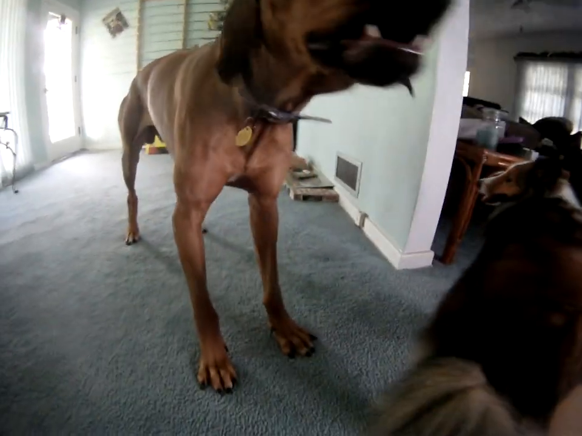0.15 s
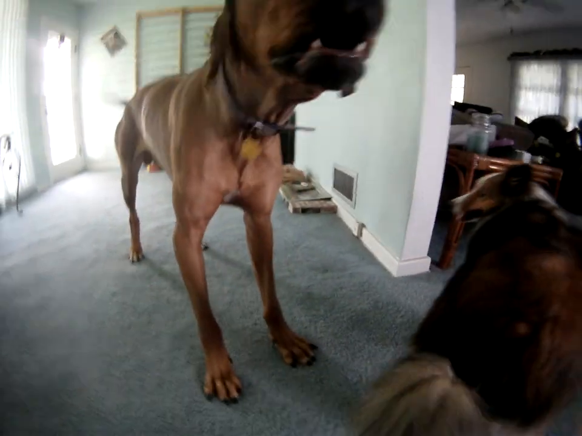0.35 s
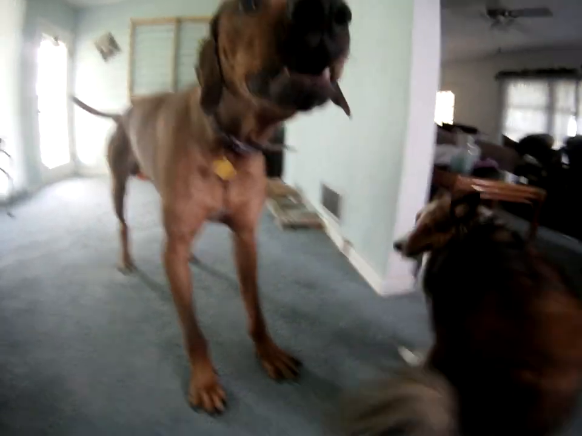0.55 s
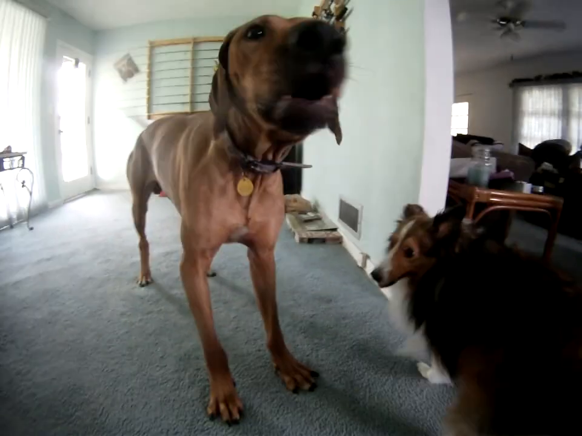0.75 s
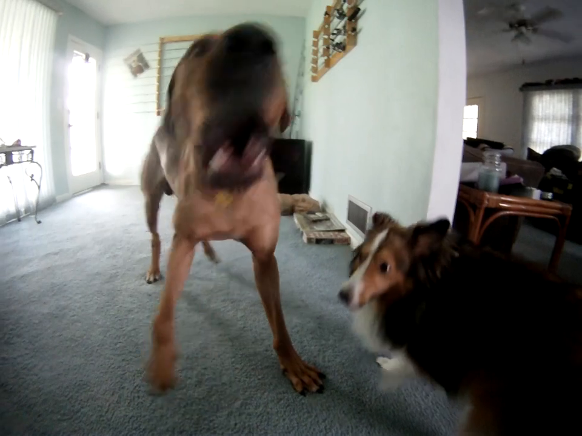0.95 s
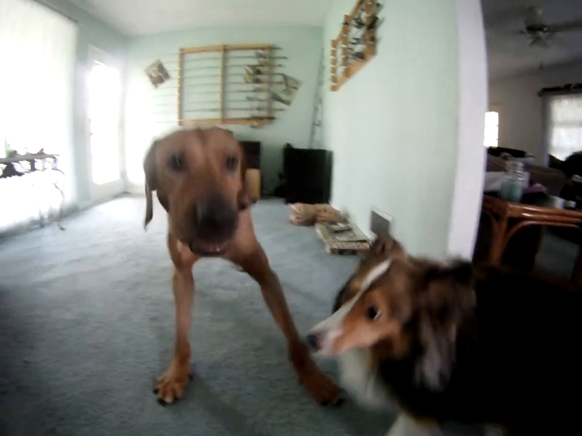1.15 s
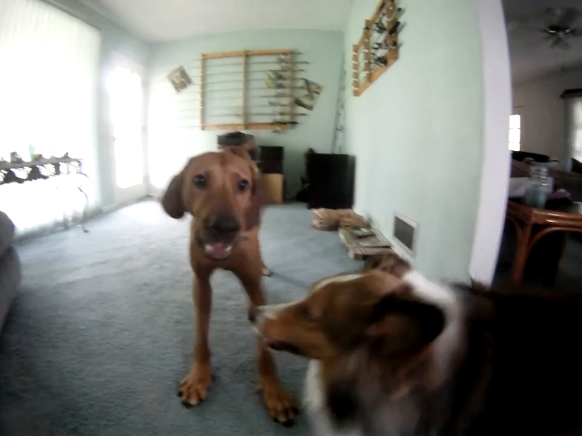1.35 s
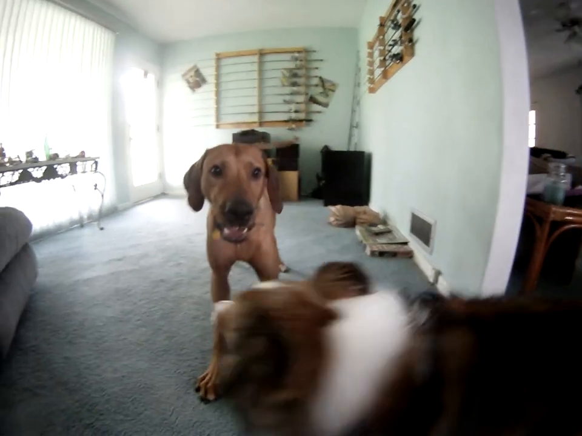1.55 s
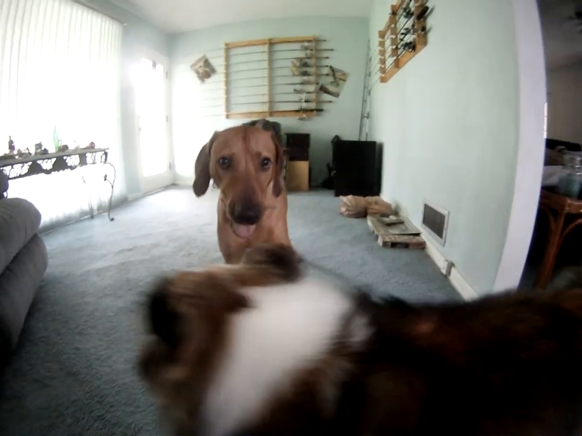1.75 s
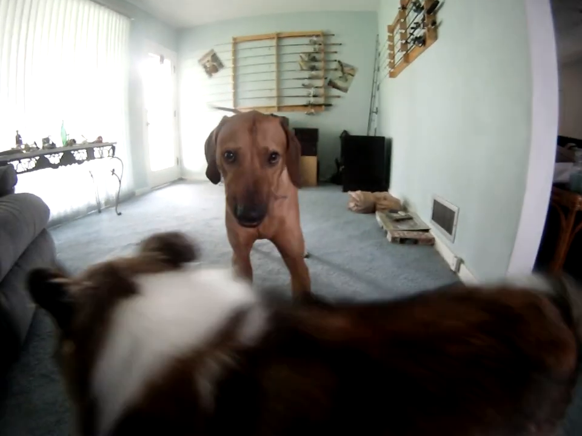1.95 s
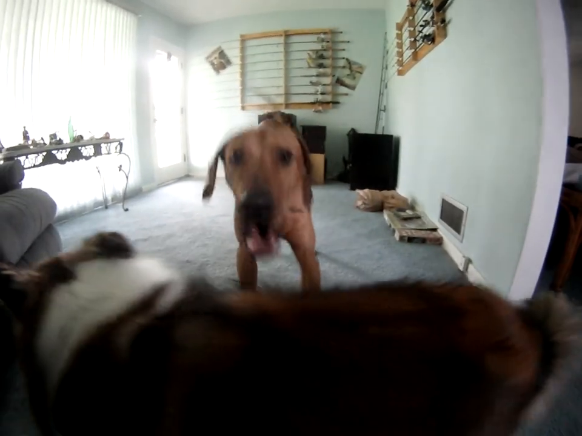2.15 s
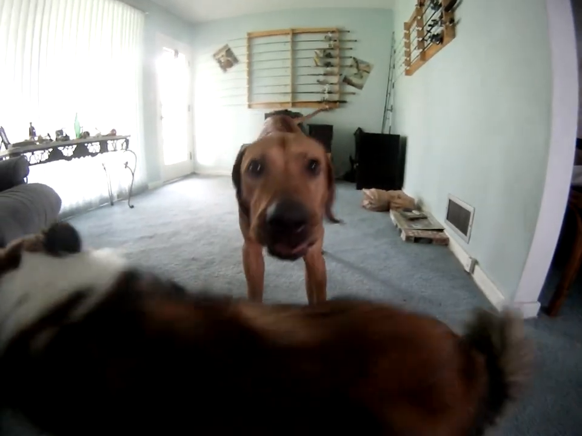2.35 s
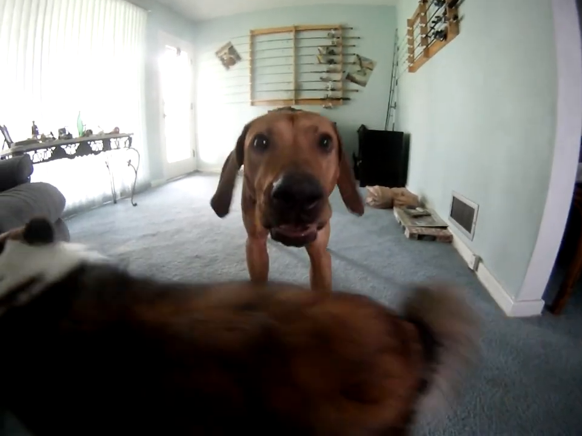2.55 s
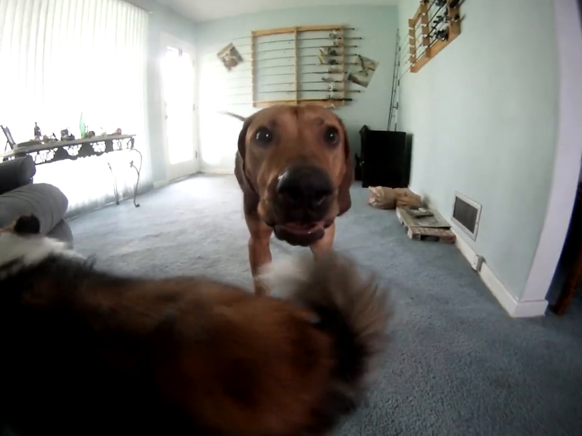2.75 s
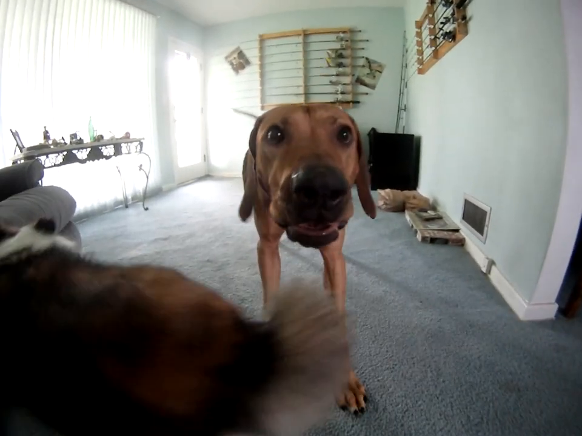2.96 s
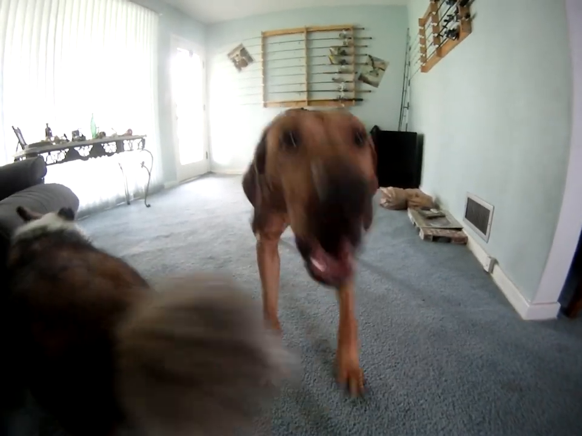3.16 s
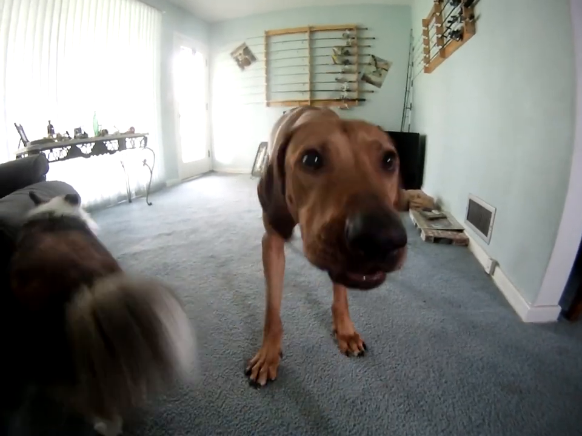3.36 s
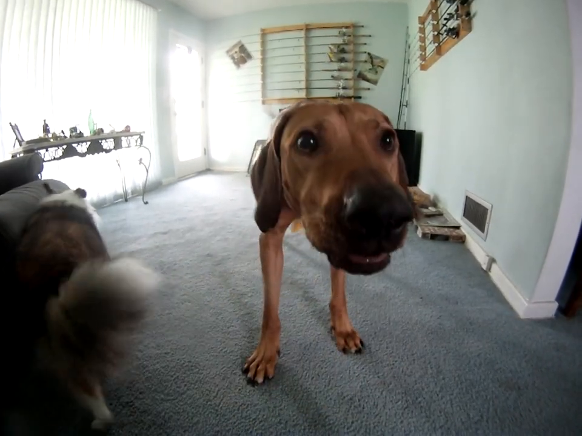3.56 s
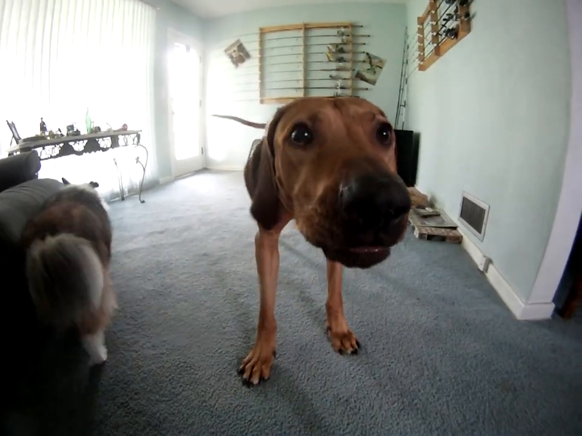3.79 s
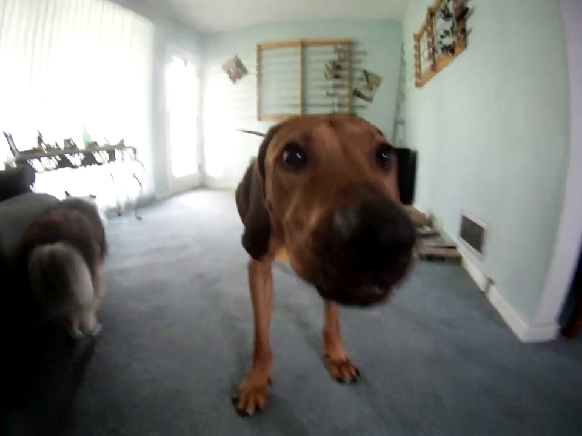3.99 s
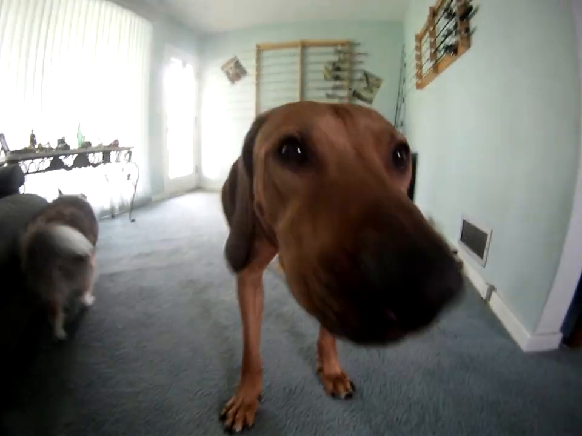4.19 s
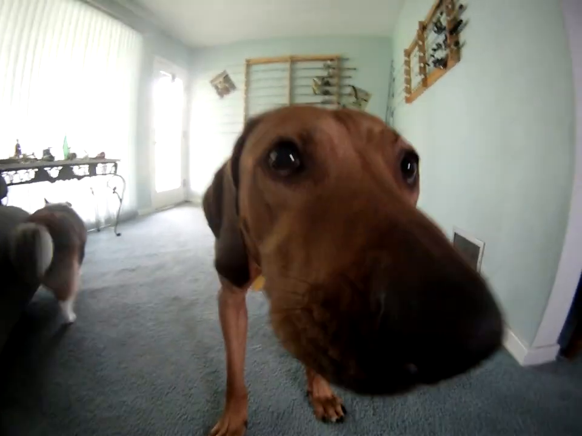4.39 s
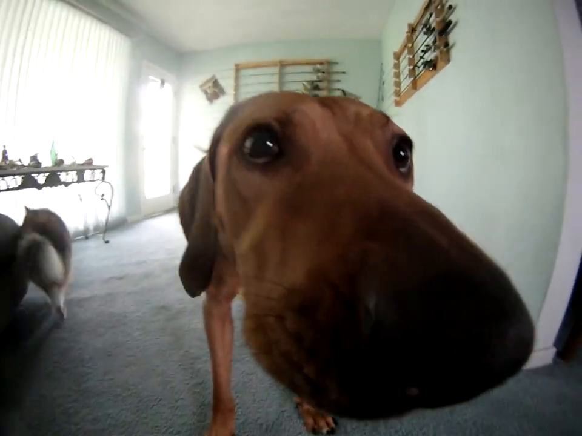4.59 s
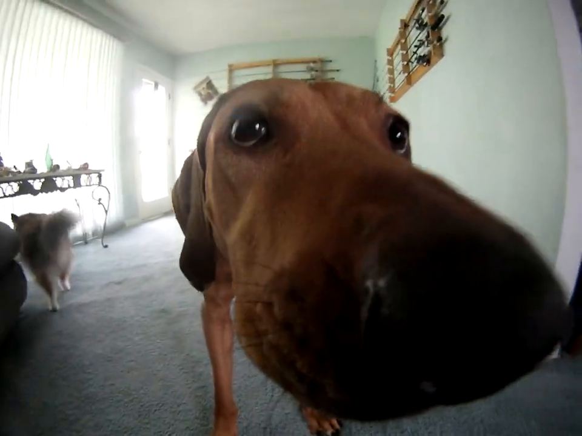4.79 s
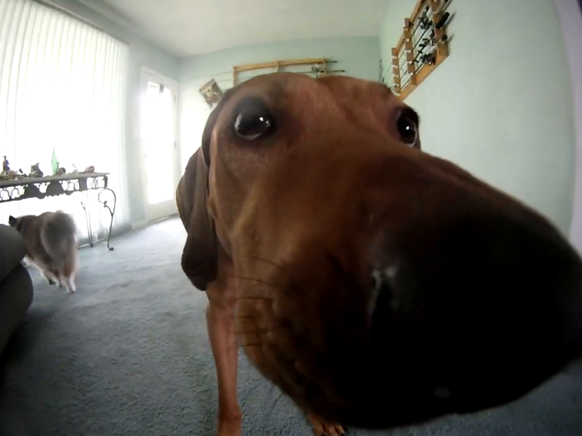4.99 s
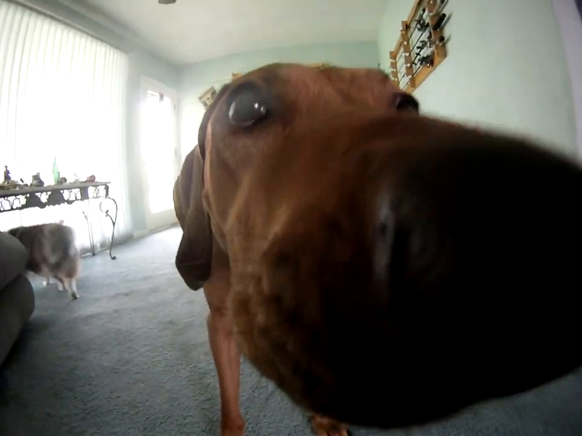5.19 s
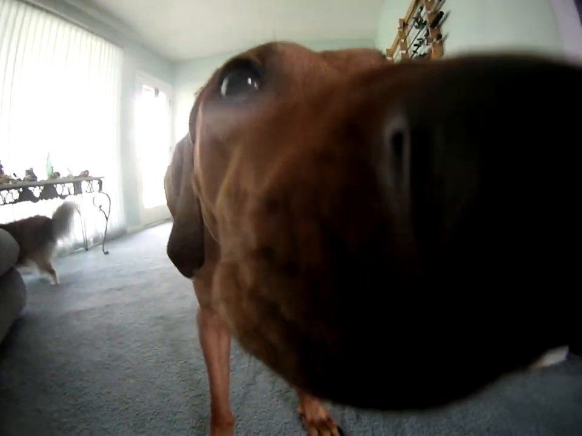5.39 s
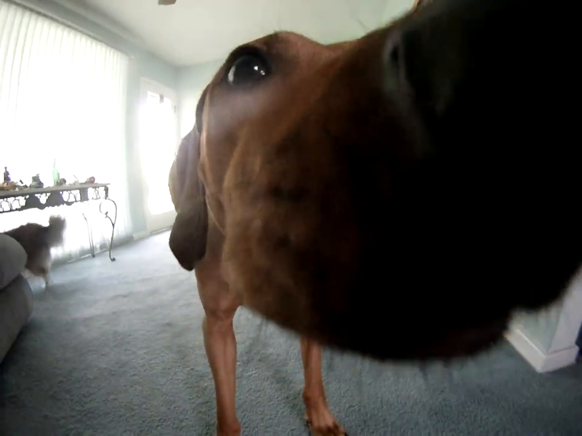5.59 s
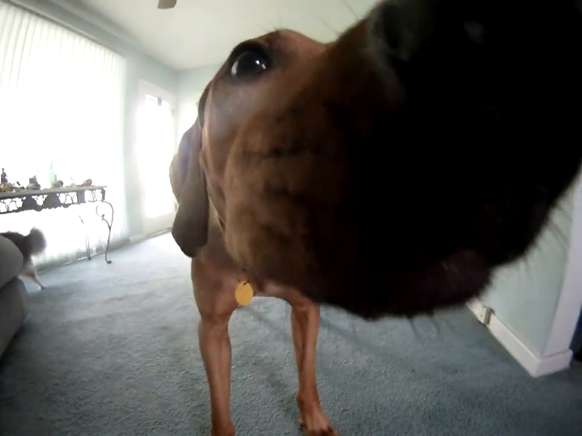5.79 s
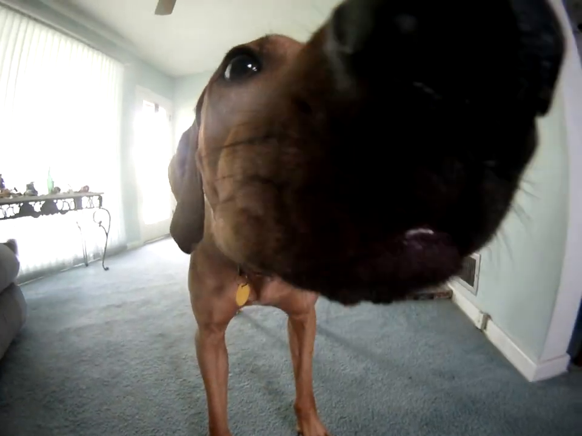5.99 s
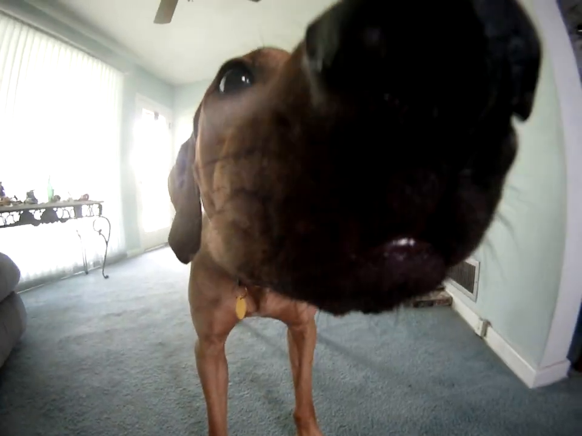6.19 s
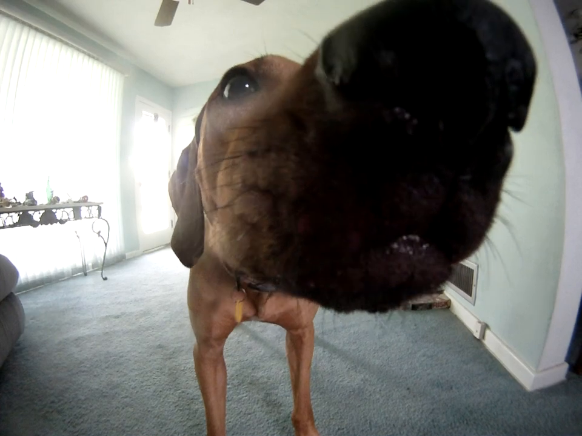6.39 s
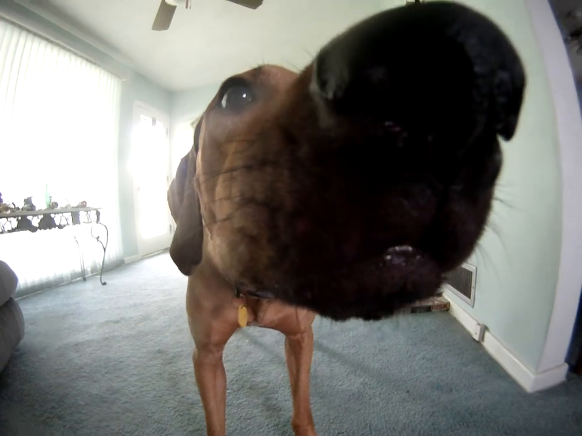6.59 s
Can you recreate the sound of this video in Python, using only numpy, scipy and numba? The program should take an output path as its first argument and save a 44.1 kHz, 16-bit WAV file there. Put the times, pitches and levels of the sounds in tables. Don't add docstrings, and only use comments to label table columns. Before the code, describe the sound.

Gritty rubbing and a burst of dull finger knocks on a plastic camera case open the scene over constant hiss. A large dog then barks three times, hoarse and short, about a second apart, with a strong gasp before the second. Finally its nose arrives at the microphone: faint sniffs, light ticks and firmer wet presses. Carpeted living room, cheap gritty microphone.

```python
import sys
import numpy as np
from scipy import signal
from scipy.fft import rfft, irfft
from scipy.io import wavfile
from scipy.ndimage import uniform_filter1d
from numba import njit

SR = 44100
rng = np.random.default_rng(int(sys.argv[2]) if len(sys.argv) > 2 else 0)


def file_out(sig):
    cols = np.atleast_2d(sig).T
    lim = np.clip(cols, -1, 1)
    pcm = np.round(lim * 32767).astype(np.int16)
    wavfile.write(sys.argv[1], SR, pcm)


def gain_from_decibels(decibels):
    exponent = np.asarray(decibels, float) / 20
    return 10 ** exponent


N = 292824

# frequency_hz, density_db (per Hz)
HISS_SPECTRUM = [(12, -30.5), (20, -3.5), (211, -12), (243, -14), (356, -17), (411, -18), (601, -19.5),
                 (1260, -24.5), (2630, -27), (4880, -30), (5900, -35.5), (7670, -74.5), (13000, -120)]
# time_s, drag_db
HAND_DRAG = [
    [(0, -28), (.035, -28), (.065, -32.5), (.245, -32.5), (.28, -41), (.45, -39), (.5, -44), (.56, -59),
     (.66, -65)],
]
# centre_hz, width_hz, level_db
RUB_RESONANCES = [(537, 120, -0.5), (869.5, 140, 0), (1510, 600, 0.5), (2260, 420, -1.5), (3530, 450, -10),
                  (5000, 500, -23.5)]
# start_s, length_s, level_db
SKIN_CATCHES = [
    (.01, .05, -30),
    (.17, .12, -35),
    (.39, .065, -30),
    (.47, .065, -37),
]
# start_s, length_s, level_db
CAPSULE_THUMPS = [
    (0, .04, -36),
    (.03, .2, -35.5),
    (.235, .03, -32),
    (.27, .12, -50),
    (.36, .2, -35),
    (.6, .055, -39),
]
# start_s, peak_db, panel_hz, hardness_db, contact_ms
FINGER_KNOCKS = [(.071, -25, 589, -2, 4.5), (.292, -24, 821, 1.5, 4.5), (.337, -18, 622, -9, 4.5),
                 (.426, -19, 638, -14, 4.5), (.464, -13.5, 619, -12, 4.5), (.494, -14, 622, -8, 4.5),
                 (.517, -15.5, 579, -20, 8), (.564, -14, 579, -15, 4.5), (.3235, -14, 668, -13, 7),
                 (.384, -12, 578, -14.5, 9.7), (.41, -16, 476, -12, 11), (.618, -14.5, 570, -20, 9.6),
                 (.56, -20.5, 720, -19, 3.6), (.612, -35.5, 540, -10, 6.8), (.244, -22, 420, -21, 5.8)]
# start_s, peak_db, panel_hz, hardness_db, contact_ms
NOSE_TOUCHES = [(3.773, -57.5, 503, -11, 5.7), (4.054, -41.5, 789, -17, 7), (4.255, -42.5, 824, -14.5, 4.8),
                (4.355, -44.5, 520, -17, 6), (4.387, -49.5, 931, -8.5, 6.5), (4.419, -51, 630, -10, 6.5),
                (4.479, -53.5, 803, -8, 10), (4.543, -51.5, 550, -11.5, 6.5), (4.936, -41.5, 519, -20, 8.3),
                (5.158, -36.5, 606, -17, 8.5), (5.222, -25.5, 630, -6.5, 5.8), (5.296, -33.5, 625, -7, 5.4),
                (5.356, -45, 616, -24, 5.3), (5.398, -43, 970, -12, 6.5), (5.429, -37, 549, -2, 5.5),
                (5.451, -45, 483, -1, 5.8), (5.487, -47, 565, -2, 6.5), (5.519, -49.5, 477, -3, 6.5),
                (6.091, -32.5, 600, -5, 6.5), (6.55, -53.5, 491, -17, 5.2),
                (5.701, -23.5, 544, -4, 14.5),
    (6.281, -29.5, 672, -10.5, 11),
    (6.099, -41.5, 650, -18, 6.5),
    (6.281, -35.5, 300, -20, 10),
    (6.274, -41, 770, -6, 10),
    (6.29, -41, 620, -17, 9.8),
    (6.258, -53, 760, -13, 9.5),
]
# mode_hz, level_db, t60_s
CASE_MID_MODES = [(1320, 0, 0.012), (1725, -2.5, .012), (2100, -5.5, 0.0087), (2550, -7, .01)]
# mode_hz, level_db, t60_s
CASE_HIGH_MODES = [(3580, 9.5, 0.02), (4040, -15.5, .008), (4770, -11, 0.011)]
# start_s, length_s, level_db, jaw_opening (0 near shut, 1 wide), lip_spread (1 wide,
# more is wider still)
BREATHS = [
    (.835, .085, -84, .95, 1.4),
    (1.38, .135, -75, .9, 1.1),
    (2.035, .11, -44.5, -.05, .33),
    (2.55, .085, -69, .4, .6),
    (3.07, .07, -81, .9, 1.1),
    (3.5, .12, -76, .8, .5),
]
# time_s, effort_db, pitch_hz, jaw_opening (0-1), lip_spread (0-1)
BARK_GESTURES = [
    [(.936, -36, 180, .12, .5), (.968, -24, 260, .35, .58), (.985, -17.5, 310, .68, .76),
     (1.06, -18.5, 366, .86, .58), (1.104, -20.5, 300, .5, .5), (1.118, -31, 240, .5, .55),
     (1.195, -42, 140, .85, .95), (1.33, -61, 100, .9, .75)],
    [(2.147, -42, 240, .05, .25), (2.181, -19, 352, .28, .4), (2.208, -18.5, 380, .6, .63),
     (2.232, -16, 424, .68, .33), (2.297, -19, 375, .45, .2), (2.325, -32, 243, .75, .5),
     (2.37, -40, 200, .8, .85), (2.5, -61, 110, .95, .85)],
    [(3.142, -48, 215, .05, .3), (3.164, -21, 265, .08, .62), (3.18, -17.5, 315, .33, .88),
     (3.218, -14.5, 392, .7, .5), (3.27, -22, 385, .68, .45), (3.298, -22, 320, .3, .2),
     (3.338, -35, 215, .75, .85), (3.43, -52, 120, .9, .85)],
]
# centre_hz, width_hz, level_db
THROAT_RESONANCES = [(376, 51, -7.5), (449, 21, 2), (500, 120, -3.5), (800, 160, 0), (1184, 130, -4),
                     (1314, 120, 4), (1550, 240, -1), (1835, 120, -7.5)]
# centre_hz, width_hz, level_db (below the third resonance)
UPPER_RESONANCES = [(3050, 300, -25), (3390, 400, -19.5), (4000, 400, -22.5), (4630, 500, -23.5),
                    (5150, 500, -22.5)]
# time_s, level_db
FOLD_SLAPS = [
    (.9885, -11),
    (1.0222, -9.5),
    (1.0385, -8.5),
    (2.2211, -4),
    (2.2325, -3.5),
    (3.2103, -7),
    (3.2228, -.5),
    (3.2257, 1),
]
# start_s, length_s, level_db
NOSE_DRAUGHTS = [
    (3.87, .08, -61),
    (4.01, .09, -54),
    (4.12, .42, -59),
    (5.37, .07, -54),
]
# start_s, length_s, level_db
NOSTRIL_PUFFS = [
    (3.98, .12, -72),
    (4.2, .26, -69),
    (4.46, .12, -73),
    (5.32, .16, -64),
    (5.42, .15, -64),
    (5.53, .12, -70),
]


def level(x, db):
    return x * gain_from_decibels(db) / np.sqrt(np.mean(x ** 2))


def noise():
    return rng.standard_normal(N)


@njit
def svf(x, g, k):
    y, band, low = np.empty(len(x)), 0., 0.
    for i in range(len(x)):
        v = (band + g[i] * (x[i] - low)) / (1 + g[i] * (g[i] + k[i]))
        band = 2 * v - band
        low = low + 2 * g[i] * v
        y[i] = k[i] * v
    return y


def ring(x, hz, width):
    g = np.tan(np.pi * hz / SR) + np.zeros(N)
    k = 1.5 * width / hz + np.zeros(N)
    return svf(svf(x + 1e-18, g, k), g, k)


def resonances(x, table):
    total = np.zeros(N)
    for i, (hz, width, db) in enumerate(table):
        total += (-1) ** i * gain_from_decibels(db) * level(ring(x, hz, width), 0)
    return level(total, 0)


def curves(tables):
    t, rows = np.arange(N) / SR, np.vstack(tables)
    gate = sum((t >= span[0][0]) & (t < span[-1][0]) for span in tables)
    columns = [np.interp(t, rows[:, 0], c) for c in rows[:, 1:].T]
    return columns, uniform_filter1d(np.minimum(gate, 1.), size=200)


def swells(table):
    t, power = np.arange(N) / SR, np.zeros(N)
    for start_s, length_s, db in table:
        bump = np.sin(np.pi * np.clip((t - start_s) / length_s, 0, 1))
        power += (gain_from_decibels(db) * bump) ** 2
    return np.sqrt(power)


def flicker(rate, db):
    hold = int(SR / rate)
    steps = np.repeat(rng.standard_normal(N // hold + 1), hold)
    return gain_from_decibels(db * uniform_filter1d(steps, hold)[:N])


def hiss():
    hz, db = np.transpose(HISS_SPECTRUM)
    f = np.maximum(np.arange(N // 2 + 1) * SR / N, 1)
    shape = gain_from_decibels(np.interp(np.log(f), np.log(hz), db))
    return level(irfft(rfft(noise()) * shape, N), -61)


def rumble(hz, width):
    return level(ring(noise(), hz, width) * flicker(rate=14, db=4.0), 0)


def rub():
    (drag_db,), gate = curves(HAND_DRAG)
    grit = noise() * gain_from_decibels(4.5 * noise())
    bands = []
    for hz, width, db in RUB_RESONANCES:
        bands.append(gain_from_decibels(db) * flicker(rate=90, db=2.2) * level(ring(grit, hz, width), 0))
    dull = gain_from_decibels(-2.5) * np.hypot(gain_from_decibels(drag_db - 5), swells(SKIN_CATCHES))
    skin = dull * sum(bands[:2]) + gain_from_decibels(drag_db - 3) * sum(bands[2:])
    return gate * skin + swells(CAPSULE_THUMPS) * rumble(41.0, 82.0)


def modes(t, table):
    return sum(gain_from_decibels(db - 60 * t / t60) * np.sin(2 * np.pi * hz * t) for hz, db, t60 in table)


def taps(table, grain_db, low_hz):
    panel_t60_s = 0.022
    out, t = np.zeros(N + 3000), np.arange(1500) / SR
    band = signal.butter(3, [low_hz, 4500], "band", fs=SR, output="sos")
    for start_s, peak_db, panel_hz, hard_db, contact_ms in table:
        slips, strength = rng.standard_normal((2, 1500))
        u = np.clip(t * 1000 / max(contact_ms, .3), 0, 1)
        force = slips * gain_from_decibels(grain_db * strength) * u ** .3 * np.sqrt(1 - u)
        panel = [(panel_hz, 0, panel_t60_s), (1.3 * panel_hz, -7, panel_t60_s)]
        parts = [(force * np.sqrt(u), panel, 0),
                 (force, CASE_MID_MODES, hard_db + 10),
                 (force * (1 - u), CASE_HIGH_MODES, 1.05 * hard_db + .5)]
        tap = 0
        for push, part_modes, db in parts:
            rung = signal.fftconvolve(push, modes(t, part_modes))
            tap = tap + gain_from_decibels(db) * rung / np.linalg.norm(rung)
        tap = signal.sosfilt(band, tap)
        at = int(start_s * SR)
        out[at:at + len(tap)] += gain_from_decibels(peak_db) * tap / np.abs(tap).max()
    return out[:N]


def lips_db(lips):
    return -18 + 30 * lips


def gestures():
    gasps, barks = [], []
    for start_s, length_s, db, jaw, lips in BREATHS:
        shape = ((0, -12), (.3, 0), (.75, 0), (1, -6))
        gasps.append([(start_s + u * length_s, db + d, 165 * (1 + .35 * u), jaw, lips) for u, d in shape])
    for bark in map(list, BARK_GESTURES):
        end_s, end_db, _, jaw, lips = bark[-1]
        barks.append(bark + [(end_s + .14, end_db - 30, 90, jaw, lips)])
    (gasp_curves, gasping), (bark_curves, barking) = curves(gasps), curves(barks)

    def loudness(c, gate):
        return gate * gain_from_decibels(c[0] + np.maximum(lips_db(c[3]), 0))

    stronger = loudness(gasp_curves, gasping) > loudness(bark_curves, barking)
    gasp = uniform_filter1d(1. * stronger, size=300)
    mixed = [gasp * p + (1 - gasp) * q for p, q in zip(gasp_curves, bark_curves)]
    return mixed, np.maximum(gasping, barking), gasp


def folds(hz, jitter, scatter_db):
    chance = np.repeat(rng.standard_normal((N // 110 + 1, 2)), 110, axis=0)[:N]
    cycle = np.cumsum(hz * np.exp(jitter * chance[:, 0])) / SR
    closures = np.diff(np.floor(cycle), prepend=0)
    pulses = closures * gain_from_decibels(scatter_db * chance[:, 1]) / np.sqrt(hz)
    return level(pulses, 0), 2 * np.pi * np.cumsum(hz) / SR


def fold_slaps():
    slaps = np.zeros(N)
    for time_s, db in FOLD_SLAPS:
        slaps[int(time_s * SR)] = -gain_from_decibels(db + 19)
    return ring(slaps, 1650., 1100.) + gain_from_decibels(2) * ring(slaps, 750., 510.0)


def dog():
    (first_db, hz, jaw, lips), gate, gasp = gestures()
    octaves = np.log2(hz / 385)
    voiced = gate * np.clip((hz - 150) / 30, 0, 1)
    third_db, mouth_db = -16 + 24 * jaw, lips_db(lips)
    second_voiced_db = -.5 + np.clip(22 * octaves, -11.5, 0)
    second_db = third_db + voiced * second_voiced_db + (1 - voiced) * -11.5

    chest = np.clip((hz - 200) / 90, 0, 1)
    bark_mouth_hz = chest * 2080 + (1 - chest) * 2300
    mouth_hz = gasp * 2130 + (1 - gasp) * bark_mouth_hz

    pitch_db = first_db + 14 * gasp + 11 * octaves
    tone_db = pitch_db - 9.5
    octave_db = pitch_db - 15.5 + 13 * jaw - 30 * np.abs(octaves)

    effort = voiced * np.clip((first_db + np.maximum(0, mouth_db) + 36.5) / 12, 0, .85)
    pulses, phase = folds(hz, jitter=.04, scatter_db=2)
    breath = noise() * flicker(rate=130, db=2)
    source = effort * pulses + np.sqrt(1 - effort ** 2) * breath

    mouth = effort * level(ring(source, mouth_hz, 220.0), 0)
    mouth += (1 - effort) * level(ring(source, mouth_hz, 250.0), 0)
    mouth += gain_from_decibels(-6 - 15 * chest - 3 * gasp) * level(ring(source, 2620., 190.0), 0)
    upper = np.zeros(N)
    for centre_hz, width, db in UPPER_RESONANCES:
        upper += gain_from_decibels(db) * flicker(rate=70, db=3.5) * level(ring(source, centre_hz, width), 0)
    third = resonances(source, THROAT_RESONANCES[4:]) + gain_from_decibels(-2 + 4.5 * effort) * upper
    second = resonances(source, THROAT_RESONANCES[3:4])
    voice = resonances(source, THROAT_RESONANCES[:3]) - gain_from_decibels(second_db - 1.0) * second
    voice = voice + gain_from_decibels(third_db) * third - gain_from_decibels(mouth_db) * mouth
    voice = gate * gain_from_decibels(first_db - 1.0) * voice
    tones = gain_from_decibels(tone_db) * np.sin(phase) + gain_from_decibels(octave_db) * np.sin(2 * phase)
    return voice + voiced * flicker(rate=55, db=3.5) * tones + fold_slaps()


def room(x):
    t60_s, tail_db, damp_hz = 0.41, -18, 3640
    t = np.arange(int(.7 * SR)) / SR
    tail = rng.standard_normal(len(t)) * gain_from_decibels(-60 * t / t60_s) * np.clip(t / .012, 0, 1)
    tail = signal.lfilter(*signal.butter(1, damp_hz, fs=SR), tail)
    return x + gain_from_decibels(tail_db) * signal.fftconvolve(x, tail / np.sqrt(np.sum(tail ** 2)))[:N]


def sniff():
    nostrils = level(ring(noise(), 1500., 1500.) * flicker(rate=70, db=3), 0)
    return swells(NOSTRIL_PUFFS) * nostrils + swells(NOSE_DRAUGHTS) * rumble(54.0, 68.3)


def scene():
    fingers = rub() + taps(FINGER_KNOCKS, grain_db=5.5, low_hz=337)
    nose = taps(NOSE_TOUCHES, grain_db=1, low_hz=341.4)
    return (hiss() + fingers + room(dog()) + nose + sniff())[None]


def top_cut(x):
    return signal.sosfilt(signal.butter(12, 15700, fs=SR, output="sos"), x)


def record(dry):
    slow = signal.resample_poly(dry, 40, 147, axis=1, window=("kaiser", 8.))
    slow = np.clip(slow, -.97, .97)
    held = signal.resample_poly(np.repeat(slow, 4, axis=1), 147, 160, axis=1)[:, :N]
    held = np.pad(held, ((0, 0), (0, N - held.shape[1])))
    held = signal.sosfilt(signal.ellip(8, .3, 60, 15600, fs=SR, output="sos"), held)
    return top_cut(held)


dry = scene()
out = record(dry)
file_out(out)
```